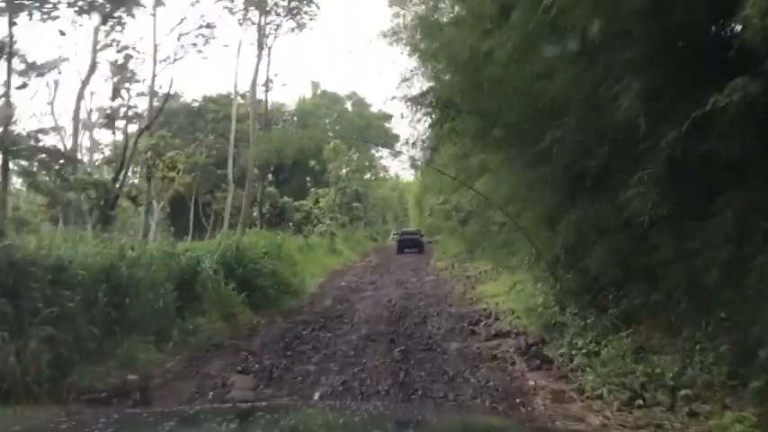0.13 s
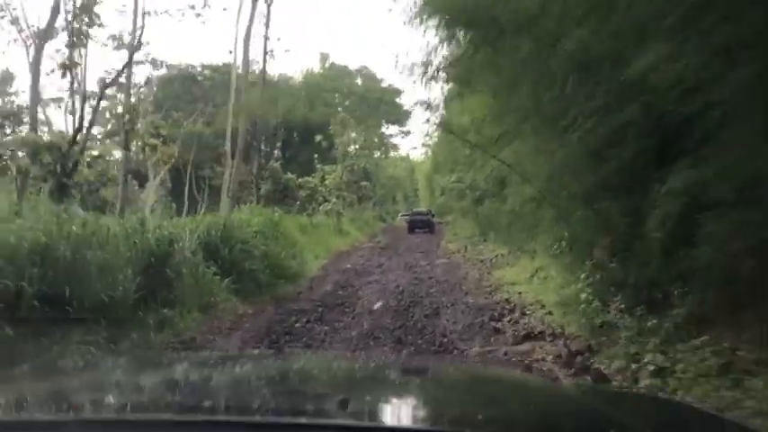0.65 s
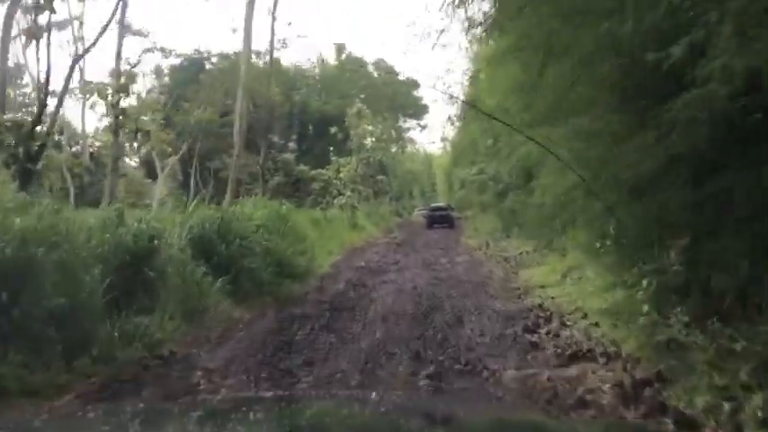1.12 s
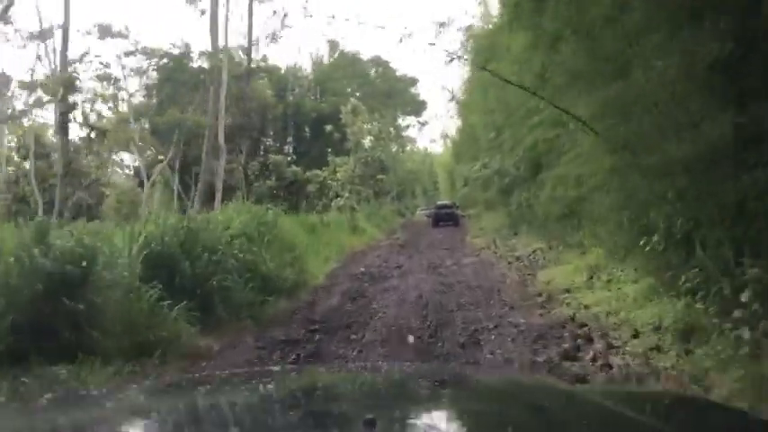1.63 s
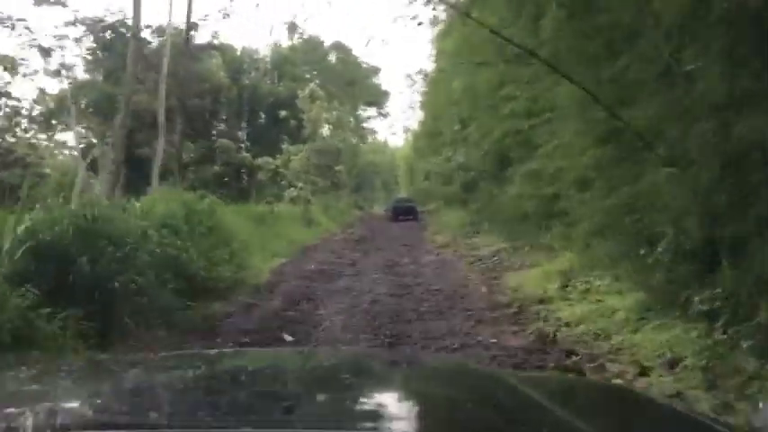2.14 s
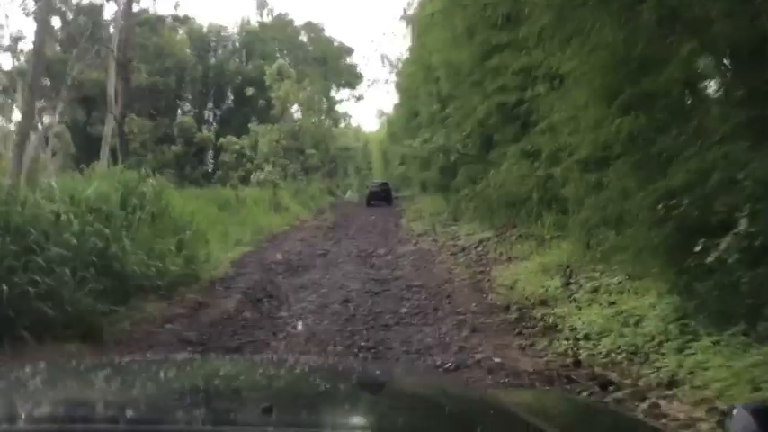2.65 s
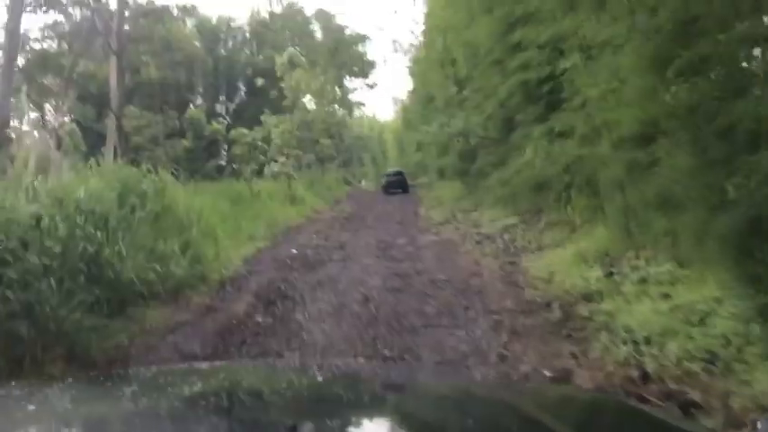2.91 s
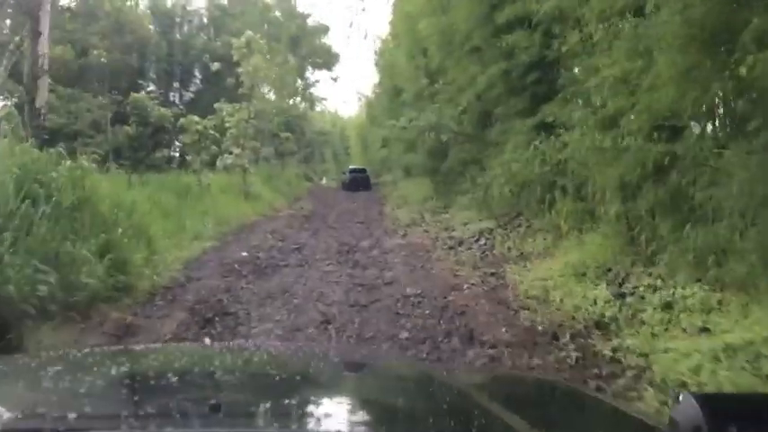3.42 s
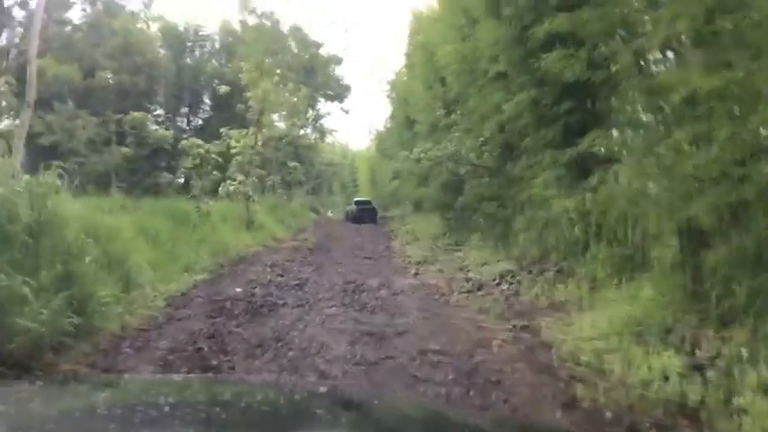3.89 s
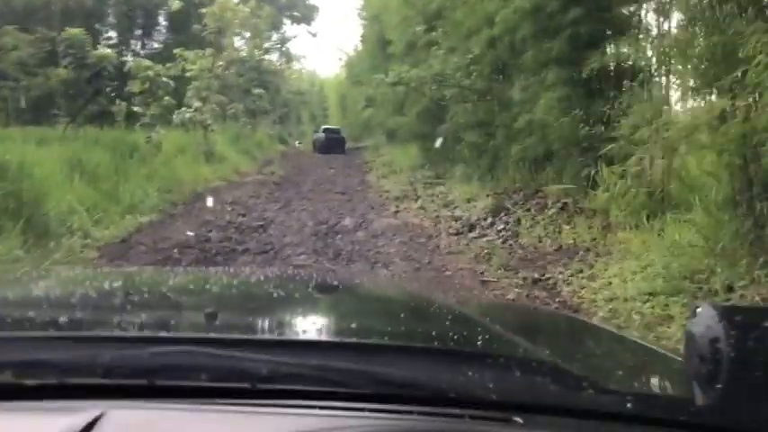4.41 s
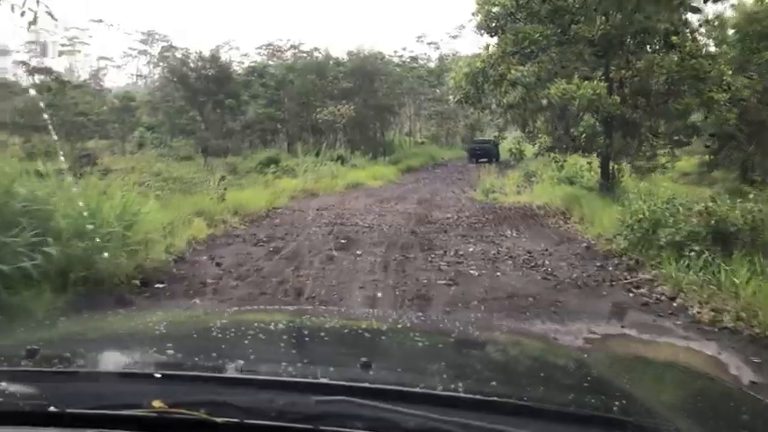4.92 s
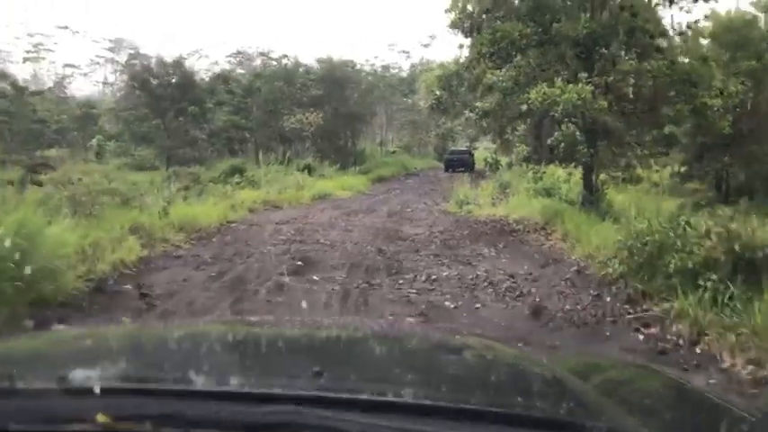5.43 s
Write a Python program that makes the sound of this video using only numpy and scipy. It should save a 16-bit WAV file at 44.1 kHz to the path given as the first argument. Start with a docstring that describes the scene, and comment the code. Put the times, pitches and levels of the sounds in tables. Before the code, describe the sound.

Inside a pickup cab on a rough wet dirt track, deep rumble and booming ruts mix with panel knocks, ticks and jingling keys, then it quiets.

```python
"""Road noise fills a pickup cab on a rough, wet dirt track: filtered noise for body boom, axle drone and tyre
roar. The engine throbs below as one unsteady low tone; ruts, suspension and a loose panel ring as decaying
modes. Grit and drops tick as noise bursts, keys jingle and a small part chirps as high modes. A short silence
leads to a quieter, smoother stretch, with splashes of noise and steady engine tones."""
import sys
import numpy as np
from scipy import signal
from scipy.fft import rfft, irfft
from scipy.io import wavfile
from scipy.ndimage import uniform_filter1d

SR = 44100
rng = np.random.default_rng(int(sys.argv[2]) if len(sys.argv) > 2 else 0)


def convert_level_to_amplitude(level_db):
    """Map a level in decibels to its linear amplitude factor."""
    exponent = np.asarray(level_db, float) / 20
    return 10 ** exponent


def log_audio(samples):
    """Write samples as a 16-bit WAV file to the path given in sys.argv[1]."""
    # one column per channel
    frames = np.atleast_2d(samples).T
    # limit to full scale, then quantise
    limited = np.clip(frames, -1, 1)
    pcm = np.round(limited * 32767).astype(np.int16)
    wavfile.write(sys.argv[1], SR, pcm)


N = 244755
T = np.arange(N) / SR
# silence between the rough and the smoother stretch: start_s, end_s
SILENCE = (4.638, 4.684)


def unit(x):
    """Normalisation: scale to rms 1."""
    return x / np.sqrt(np.mean(x ** 2))


def resonate(x, hz, width):
    """Two-pole resonance: a damped mode passes a band of the given width in Hz."""
    return signal.lfilter(*signal.iirpeak(hz, hz / width, fs=SR), x)


def walk(rate):
    """Slow random modulation: normal values held 1 / rate s, then smoothed twice."""
    k = int(SR / rate)
    held = np.repeat(rng.standard_normal(N // k + 1), k)
    return uniform_filter1d(uniform_filter1d(held, k), k)[:N]


def coloured(x, spectrum):
    """Spectral shaping: weight x by relative (hz, db) points, then normalise to rms 1."""
    hz, db = np.transpose(spectrum)
    log_hz = np.log(np.fft.rfftfreq(N, 1 / SR) + 1)
    return unit(irfft(rfft(x) * convert_level_to_amplitude(np.interp(log_hz, np.log(hz), db)), N))


def grit(rate, spread, smear_s):
    """Random impact process: grains of uneven size, rate per second, each with a short noisy tail."""
    size_db = spread * np.minimum(rng.exponential(size=N), 3.0)
    grains = (rng.random(N) < rate / SR) * convert_level_to_amplitude(size_db)
    fade = [1, -np.exp(-1 / (smear_s * SR))]
    envelope = signal.lfilter([1], fade, signal.lfilter([1], fade, grains))
    return unit(envelope * rng.standard_normal(N))


def ring(hz, t60, rise_s):
    """Free vibration of one struck mode: a sine with a rounded onset and exponential decay."""
    t = T[:int(t60 * SR)]
    return np.sin(2 * np.pi * hz * t) * convert_level_to_amplitude(-60 * t / t60) * (1 - np.exp(-t / rise_s))


def add(out, s, x):
    """Superposition: mix x into out from time s."""
    i = int(s * SR)
    out[i:i + len(x)] += x[:N - i]


def swell(peak_s, rise_s, fall_s):
    """Transient modulation: a bell-shaped hump of height 1 with its own rise and fall."""
    t = T - peak_s
    return np.exp(-(t / np.where(t < 0, rise_s, fall_s)) ** 2)


def body(modes, even):
    """Forced vibration: noise drives body modes; dividing by a power of their level evens the swings."""
    x = 0
    for hz, width, db in modes:
        mode = resonate(resonate(rng.standard_normal(N), hz, width), hz, 2 * width)
        x = x + convert_level_to_amplitude(db) * mode / np.sqrt(width)
    swing = uniform_filter1d(x ** 2, int(.06 * SR)) + 1e-12
    return unit(x / swing ** (even / 2))


def patchy(spectrum, lo_hz, count, shared, flicker_db, grain):
    """Band-wise modulation: half-octave noise bands flicker and crunch independently."""
    x = 0
    rough = np.where(T < SILENCE[1], 1, 0.76)  # less crunch and flicker on the smoother stretch
    for hz in lo_hz * 2 ** (np.arange(count) / 2):
        band = rng.standard_normal(N) * convert_level_to_amplitude(rough * (shared + flicker_db * walk(18)))
        band = band + grain * rough * grit(90, 5.1, 0.0018)
        x = x + resonate(resonate(band, hz, hz / 2), hz, hz / 2)
    return coloured(x, spectrum)


def road():
    """Structure-borne and contact noise: boom, drone, roar and hiss follow the track's roughness."""
    # roughness on each of the two stretches: time_s, boom_db, drone_db, roar_db
    track = [
        [(0.0, -27.5, -37, -41.5), (.4, -31, -33, -39.5), (.75, -26, -33.5, -38.5), (1.1, -27, -32, -40.5),
         (1.4, -27.5, -31.5, -39.5), (2.1, -34, -32, -39.5), (2.55, -25, -32, -40), (3.2, -32, -32, -40),
         (3.56, -31, -35, -42), (4.05, -27.5, -29, -38), (4.25, -25, -28.5, -37), (4.63, -33, -37, -41)],
        [(4.69, -37, -39, -44.5), (5.0, -32.5, -43, -43.5), (5.3, -32, -40, -41.5), (5.55, -31, -32.5, -41)],
    ]
    # bumps that swell the road noise: peak_s, boom_db, drone_db, roar_and_hiss_db
    bumps = [(.21, -6, 7.5, 2), (.31, 10, -0.5, 0), (.46, 11.5, 1.5, -1), (.62, 5, 4, 3),
             (0.853, 4, 12, 5.5), (1.04, 1.5, 8.5, 1), (1.52, 3, 2, 2.5), (1.839, 2.5, -1, 1),
             (1.95, 6.5, -0.5, -2.5), (2.63, -1, 3.5, 2), (2.721, -2, 5.5, 1), (3.28, -12, 4, 3),
             (3.4, 5, 9, 0), (4.12, -1, -0.5, -0.5), (4.55, 7, -5, 0), (5.01, 0.5, -3, -1),
             (5.22, 3.5, 2.5, -1.5)]
    # modes of cab air and floor pan: centre_hz, width_hz, relative_db
    boom_modes = [(65.6, 17.8, -3), (88, 17.8, -8.5)]
    # modes of the axle drone: centre_hz, width_hz, relative_db
    axle_modes = [(125.3, 25.5, 2), (168.5, 22.2, 1.5), (192.4, 27, -7.5)]
    # spectrum of the tyre roar: frequency_hz, relative_db (per Hz)
    tyre_spectrum = [(130, -21), (220, -0.5), (249, -3.5), (314, 0.5), (430, -10.5), (491, -10), (792, -18),
                     (981, -14), (1100, -13.5), (1260, -14.5), (1570, -25.5), (1730, -32.5), (1860, -21),
                     (2020, -46), (2500, -33), (3250, -68), (5500, -120)]
    # spectrum of the gravel hiss: frequency_hz, relative_db (per Hz)
    gravel_spectrum = [(1180, 1.5), (2000, 0.5), (2490, -1.5), (4820, -12), (5780, -12), (7640, -17.5),
                       (9410, -16.5), (10400, -22.5), (11200, -15.5), (14000, -17.5), (16000, -12)]
    # small parts rattling on the rough stretch: centre_hz, width_hz, mean_level_db
    small_parts = [(1127, 280, -58), (306, 80, -52.5), (5530, 230, -84), (11200, 650, -80),
                   (14400, 600, -79), (1872, 22, -67.5)]

    s, *columns = np.vstack(track).T
    humps = np.array([swell(b[0], rise_s=0.047, fall_s=0.033) for b in bumps])
    steady_db = np.array([np.interp(T, s, c) for c in columns])
    boom_db, axle_db, roar_db = steady_db + np.array(bumps)[:, 1:].T @ humps
    # the hiss falls less than the roar on the smoother stretch
    hiss_db = roar_db - 16.5 + 1.5 * (T > SILENCE[1])

    jolt = walk(29.91)
    roar = patchy(tyre_spectrum, 191.2, count=9, shared=2.07 * jolt, flicker_db=2.0, grain=0.38)
    hiss = patchy(gravel_spectrum, 1580, count=7, shared=1.1 * jolt, flicker_db=-3.5, grain=0.84)
    rumble = unit(resonate(resonate(rng.standard_normal(N), 24.0, 32), 32.5, 19)) * convert_level_to_amplitude(-38)
    # loose parts shake harder where the gravel hiss is louder
    shake = convert_level_to_amplitude(0.63 * (hiss_db - hiss_db.mean())) * (T < SILENCE[0])
    rattle = sum(convert_level_to_amplitude(db) * unit(resonate(grit(60, 5.0, 0.0026), hz, width)) for hz, width, db in small_parts)

    boom = convert_level_to_amplitude(boom_db) * body(boom_modes, 0.12)
    drone = convert_level_to_amplitude(axle_db) * body(axle_modes, 0.21)
    return boom + drone + convert_level_to_amplitude(roar_db) * roar + convert_level_to_amplitude(hiss_db) * hiss + rumble + shake * rattle


def engine():
    """Frequency and amplitude modulation: the firing tone is shaken in pitch and level."""
    # level of the throb before shaking: time_s, level_db
    throb = [(0.0, -24), (0.296, -32), (.55, -29), (1.1, -28.5), (1.799, -30), (2.4, -29.5), (2.75, -30.5),
             (3.151, -28), (3.6, -34.5), (4.3, -25.5), (4.63, -29.5), (4.8, -33.5), (5.1, -36), (5.55, -37)]
    s, db = np.transpose(throb)
    pitch_hz = 42.6 * (1 + 0.197 * walk(25) + 0.16 * walk(9))
    phase = 2 * np.pi * np.cumsum(pitch_hz) / SR
    return np.sqrt(2) * np.sin(phase) * convert_level_to_amplitude(np.interp(T, s, db) + 4.2 * walk(22.06))


def ruts():
    """Impulse response of the cab: each deep rut rings one low mode."""
    # deep ruts: start_s, level_db, pitch_hz, t60_s
    deep_ruts = [(0.644, -10.5, 80, 0.1), (0.829, -8.5, 72, .1), (0.874, -16, 68, .3),
                 (1.553, -10.5, 64.3, 0.31), (2.702, -12, 74, 0.27), (3.269, -11, 68, 0.35),
                 (4.108, -9, 84.8, 0.23)]
    out = np.zeros(N)
    for s, db, hz, t60 in deep_ruts:
        add(out, s, convert_level_to_amplitude(db) * ring(hz, t60, 0.0045))
    return out


def thumps():
    """Impulse response of the suspension: two modes ring, the lower one weaker."""
    # suspension thumps: start_s, level_db, pitch_hz
    jolts = [(0.203, -29.5, 457), (0.785, -31.5, 420), (1, -24, 298), (0.24, -20, 158), (0.616, -22.5, 130),
             (0.612, -23, 348), (0.493, -30, 330), (0.659, -29.5, 336), (2.3, -30, 566), (2.342, -31, 340),
             (2.98, -31.5, 440), (3.068, -28.5, 586), (3.3, -32, 800), (4.34, -34, 920)]
    out = np.zeros(N)
    for s, db, hz in jolts:
        add(out, s, convert_level_to_amplitude(db) * ring(hz, 32.0 / hz, 0.00062))  # dies by 60 dB in 32 cycles
        add(out, s, convert_level_to_amplitude(db - 13.0) * ring(0.62 * hz, 0.12, 0.0043))
    return out


def knocks():
    """Modal superposition: blows ring panel modes, neighbours in opposite phase, over a dry crack."""
    # blows on the loose panel: start_s, blow_db, low_modes_db, high_modes_db, strongest_hz
    blows = [(0.137, -26.5, -15, -16, 1420), (0.466, -34.5, -30, -12, 1102), (0.601, -28.5, -25, -11, 1420),
             (1.01, -18, -15, -9, 1420), (1.0374, -21, -10.5, -10, 1220), (1.303, -18, -14, -14, 1380),
             (1.4959, -30.5, -9, -14, 1070), (1.998, -34.5, 2.5, -7, 1100), (2.0853, -20.5, -8, -17, 1250),
             (2.4085, -26, -7, -10, 1420), (2.6608, -30, -7, -12, 1070), (2.7383, -32.5, -3, -5, 1400),
             (3.0765, -27, -1, -20, 1220), (3.292, -31, -17, -24, 1110), (3.633, -24, -9.5, -23, 1180),
             (4.0193, -27, -8, -16, 970), (4.0814, -31, -21, -17, 980), (4.3277, -42, -8, 6, 1100),
             (4.3425, -15, -8.5, -19.5, 1285), (0.617, -38, -13, -14, 1300), (0.737, -36, -12, -21, 1090),
             (0.825, -29, -3, -6, 980), (0.874, -33.5, -11, -3, 1000), (1.222, -34.5, -14, -5, 1060),
             (2.059, -35, -12, -12, 1080), (5.247, -38, -19, -16, 1180), (4.105, -31.5, -2, -8, 1000),
             (4.293, -35, -14, 0, 1070), (4.531, -34, -8, -10, 1030)]
    # modes of the panel: nominal_hz, relative_db, t60_s
    panel = [(603, 2, 0.023), (772, -5.5, 0.051), (1070, -6.5, 0.056), (1292, -7, 0.044), (1420, -7, 0.03),
             (1820, -10, 0.014), (2266, -3, 0.031), (2774, -9.5, 0.028)]
    out, crack = np.zeros(N), np.zeros(N)
    chance = rng.standard_normal((len(blows), len(panel), 2))
    signs = (-1) ** np.arange(len(panel))  # opposed starts make the ring swell
    t = T[:int(.06 * SR)]
    crack_shape = np.exp(-t / 0.0016) + 0.39 * np.exp(-t / 0.011)
    for (s, db, low_db, high_db, best_hz), c in zip(blows, chance):
        for (hz, mode_db, t60), (a, b), sign in zip(panel, c, signs):
            if hz < 900:
                tilt_db = low_db
            elif hz > 1600:
                tilt_db = high_db
            else:
                tilt_db = 5 - 33 * abs(np.log2(hz / best_hz))
            blow_db = db + tilt_db + mode_db + 0.5 * a
            blow = sign * convert_level_to_amplitude(blow_db) * ring(hz * (1 + 0.028 * b), t60, 0.0014)
            add(out, s, blow)
            # the panel slaps back once, about 11 ms later
            add(out, s + 0.011 * (1 + 0.174 * np.tanh(a)), convert_level_to_amplitude(-21) * blow)
        add(crack, s - .0003, convert_level_to_amplitude(db + .5 * high_db - 8) * crack_shape)
    crack_spectrum = [(400, -25), (900, 8.5), (1400, 5), (2500, -1.5), (4500, -12.5), (8000, -39)]
    return out + crack * coloured(rng.standard_normal(N), crack_spectrum)


def ticks():
    """Impact noise: grit and drops on the bodywork make dull and bright bursts with a sharp contact."""
    # single ticks: start_s, dull_db, bright_db, length_ms (at least 0.5 is used)
    single_ticks = [(0.202, -45, -69, 12), (0.452, -46, -53, 8.3), (0.482, -47.5, -67, 4.4),
                    (0.626, -39.5, -51, 7), (0.737, -45, -62, 4), (0.754, -47.5, -73, 10),
                    (0.7852, -43, -39.5, 4.9), (1.046, -56, -52, 3.5), (0.804, -46.5, -48, 19),
                    (0.841, -45, -47, 6.2), (1.009, -44, -54, 6.8), (1.293, -47, -65, 10),
                    (1.533, -48.5, -59, 6), (1.547, -47, -58, 4), (1.773, -53, -50.5, 29),
                    (1.877, -50.5, -55, 13), (2.082, -48, -55, 7.5), (2.154, -50, -69, 3.9),
                    (2.2871, -48, -48, 4.3), (2.345, -49, -62, 17), (2.674, -38, -68, 5.4),
                    (2.76, -49, -64, 5), (2.8078, -43.5, -50, 4.1), (2.819, -45, -47, 2),
                    (2.983, -45, -58, 6.3), (3.118, -45, -41.5, 4.3), (3.147, -44.5, -57, 5.6),
                    (3.179, -46, -57, 2.9), (3.244, -49, -68, 3.6), (3.305, -49, -53, 16),
                    (4.082, -47, -49, 10), (4.0205, -46, -55, 1.1), (4.106, -45.5, -64, 11),
                    (4.329, -42.5, -39.5, 0.82), (4.371, -60, -52, 3.1), (4.816, -78, -49.5, 5.1),
                    (5.101, -52, -73, 4.3)]
    low, high, click = np.zeros((3, N))
    # 11 faint ticks scattered over the rough stretch
    faint = [(a * SILENCE[0], -54.5 + 6 * b, -64 + 6 * c, 6.1 * (0.44 + d))
             for a, b, c, d in rng.random((11, 4))]
    for s, db, high_db, length_ms in single_ticks + faint:
        length_ms = max(length_ms, .5)
        t_ms = T[:int(.1 * SR)] * 1000
        t = t_ms / length_ms
        burst = np.exp(-t) * (1 - np.exp(-t / 0.5))
        burst = burst / burst.max() + convert_level_to_amplitude(2) * np.exp(-t_ms / 0.59)  # sharp first contact
        add(click, s, np.array([convert_level_to_amplitude(db + 8) / length_ms]))  # weaker as ticks get longer
        add(low, s, convert_level_to_amplitude(db) * burst)
        add(high, s, convert_level_to_amplitude(high_db) * burst)
    dull_spectrum = [(1200, 13.5), (2300, 11.0), (5000, 5.0), (7000, -3.0), (9000, -58)]
    bright_spectrum = [(5000, -7), (7000, 1.0), (10500, -1.5), (14000, -2.5), (16000, 5.5)]
    dull = coloured(grit(3000, 1.1, 0.00082), dull_spectrum)
    bright = coloured(rng.standard_normal(N), bright_spectrum)
    return low * dull + high * bright + resonate(click, 2200, 2600)


def jingle():
    """Modal excitation: keys brush together, ringing most in the modes near the pitch struck."""
    # key strikes: start_s, level_db, strongest_hz
    strikes = [(0.353, -44, 14500), (0.458, -49, 10500), (0.5691, -48, 14600), (0.9386, -47, 14500),
               (1.0186, -46, 14150), (1.145, -37.5, 13300), (1.7015, -42, 14100), (1.726, -37, 13300),
               (1.765, -36, 14400), (1.8587, -39, 14500), (1.9108, -35, 14800), (2.1473, -35.5, 14500),
               (2.819, -42, 14400)]
    # modes of the keys: pitch_hz, relative_db
    key_modes = [(14550, -9), (14150, -11), (13300, -8), (10500, -4), (9700, 4)]
    out = np.zeros(N)
    chance = rng.random((len(strikes), len(key_modes), 3, 2))
    for (s, db, best_hz), c in zip(strikes, chance):
        for (hz, mode_db), touches in zip(key_modes, c):
            level_db = db + mode_db - 45 * abs(np.log2(hz / best_hz))
            # a flurry of three touches, each later one softer and further detuned
            for k, (detune, late) in enumerate(touches):
                touch = ring(hz * (1 + 0.028 * k * (detune - .5)), 0.037, 0.0013)
                add(out, s + 0.0077 * k * late, convert_level_to_amplitude(level_db - 1.8 * k) * touch)
    return out


def chirps():
    """Beating of close modes: a small loose part sounds four detuned tones and an overtone."""
    # single chirps: start_s, level_db
    single_chirps = [(.99, -47), (1.49, -45), (2.3865, -45), (2.583, -44.5), (2.9143, -46), (3.025, -51),
                     (3.31, -50), (4.0821, -47), (4.217, -43), (2.35, -60.5), (2.465, -54), (2.65, -59),
                     (2.94, -46), (3.27, -48), (4.265, -45), (4.4593, -45)]
    out = np.zeros(N)
    t60_s = 0.059
    # 26 faint chirps scattered over the rough stretch
    faint = [(a * SILENCE[0], -57.5 + 7 * b) for a, b in rng.random((26, 2))]
    every = single_chirps + faint
    for (s, db), c in zip(every, rng.standard_normal((len(every), 4))):
        for detune in c:
            add(out, s, convert_level_to_amplitude(db - 6.5) * ring(5700 * (1 + 0.0287 * detune), t60_s, 0.0052))
        add(out, s, convert_level_to_amplitude(db - 12 + 4 * c[0]) * ring(7000, t60_s, 0.0048))
    return out


def spray():
    """Turbulent splash noise: puddle water on the wheel arch holds briefly, then decays exponentially."""
    # splashes: start_s, level_db, hold_s
    splashes = [(4.729, -51, 0.0074), (4.739, -42, 0.0078), (4.755, -46, 0.0031)]
    shape = np.zeros(N)
    for s, db, hold_s in splashes:
        decay_db = 60 * np.maximum(T - s - hold_s, 0) / 0.077  # t60 of 77 ms
        shape = shape + convert_level_to_amplitude(db - decay_db) * (T > s)
    water = rng.standard_normal(N) + 1.3 * grit(900, 2.9, 0.00099)
    hiss = coloured(water, [(1800, -10), (2800, 0.5), (6000, 0.0), (10500, -2.0), (13500, -0.5), (16000, -8.0)])
    return hiss * uniform_filter1d(shape, int(0.001 * SR))


def hum():
    """Tonal excitation: steady engine orders waver in level and stand out on the smoother stretch."""
    # engine orders: pitch_hz, level_db
    tones = [(107.7, -39.5), (183.0, -43), (290.7, -52.5)]
    # span in which they rise and fade: start_s, end_s
    smooth_span = (4.72, 5.3)
    start_s, end_s = smooth_span
    arch = np.sin(np.pi * np.clip((T - start_s) / (end_s - start_s), 0, 1)) ** .5
    return arch * sum(np.sqrt(2) * convert_level_to_amplitude(db + 2.0 * walk(7.0)) * np.sin(2 * np.pi * hz * T) for hz, db in tones)


def cab(x):
    """Reverberation by convolution: short dense reflections off glass and dashboard."""
    t = T[:int(.08 * SR)]
    tail = unit(rng.standard_normal(len(t))) * convert_level_to_amplitude(-60 * t / 0.13) * (t > .002)
    return x + convert_level_to_amplitude(-35.0) * signal.fftconvolve(x, tail)[:N]


def scene():
    """Superposition of road, engine and spray with the small hits reflected in the cab."""
    steady = engine() + hum() + road() + spray()
    hits = knocks() + thumps() + ruts() + ticks() + jingle() + chirps()
    return (steady + cab(hits))[None]


def band_limit(x):
    """A steep low-pass at the top of the band."""
    return signal.sosfilt(signal.butter(12, 16270, fs=SR, output="sos"), x)


def record(dry):
    """Band limiting: the microphone drops the deepest bass and the top; a gate silences the join."""
    x = signal.sosfilt(signal.butter(2, 22, "high", fs=SR, output="sos"), dry)
    x = signal.sosfilt(signal.ellip(8, .2, 60, 15850, fs=SR, output="sos"), x)
    outside_s = np.maximum(SILENCE[0] - T, T - SILENCE[1])
    gate = np.clip(outside_s / 0.000062, 0, 1)  # ramps of 62 microseconds
    return band_limit(x * gate)


dry = scene()
out = record(dry)
log_audio(out)
```